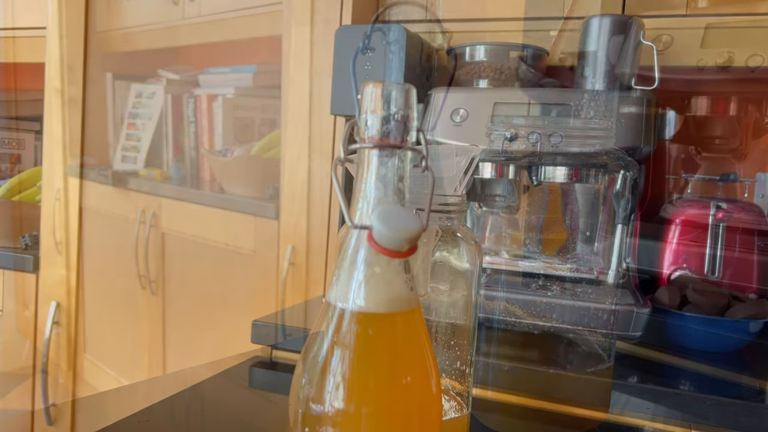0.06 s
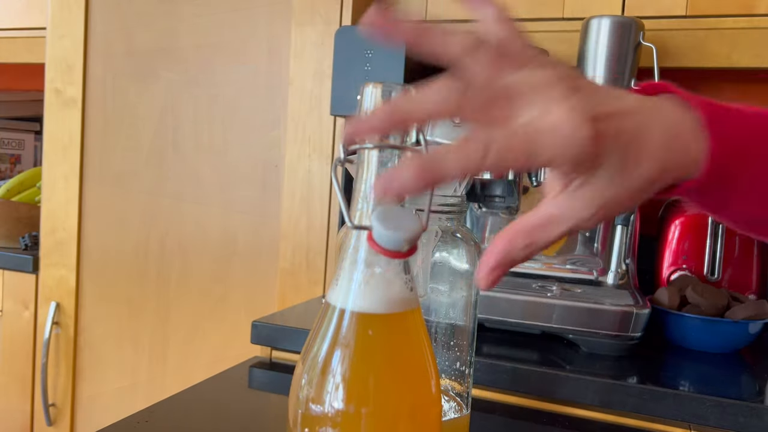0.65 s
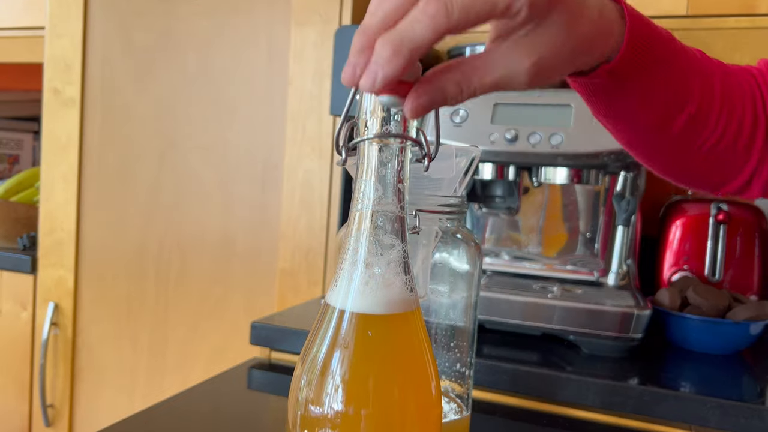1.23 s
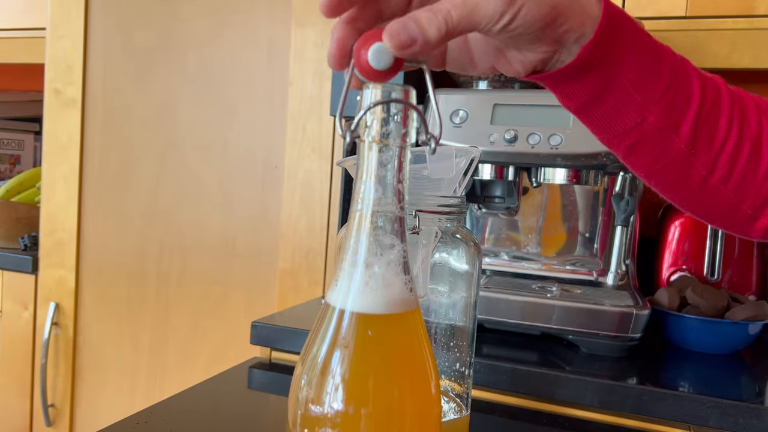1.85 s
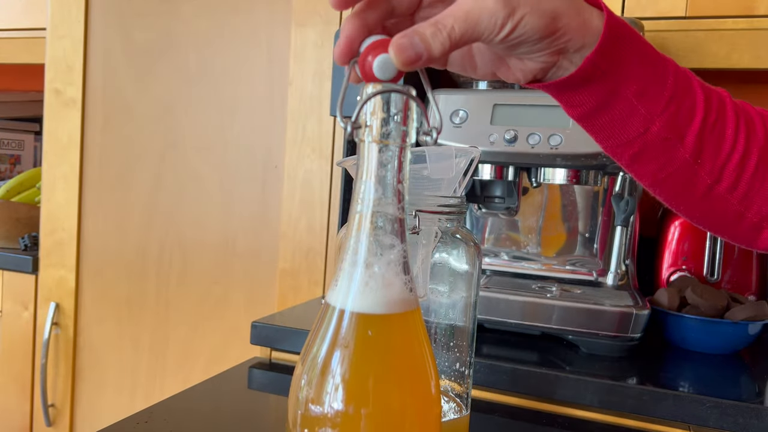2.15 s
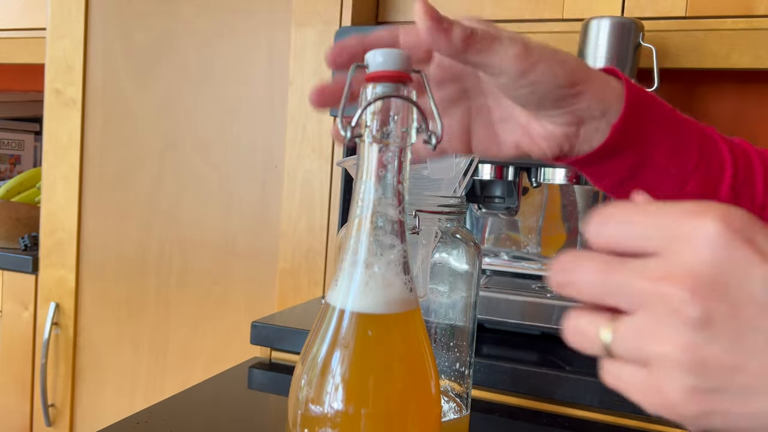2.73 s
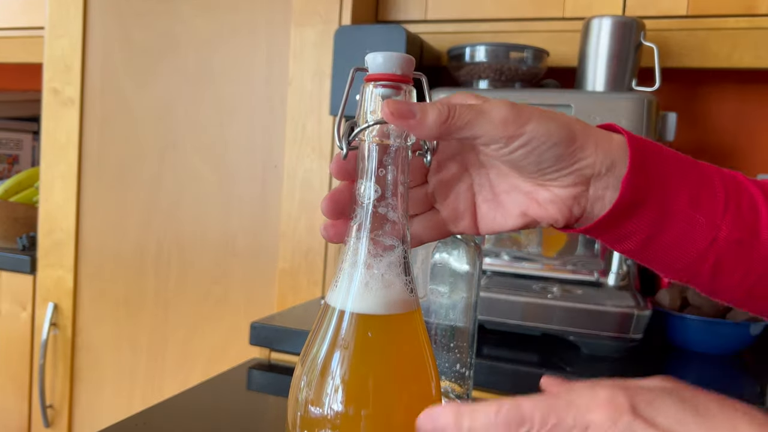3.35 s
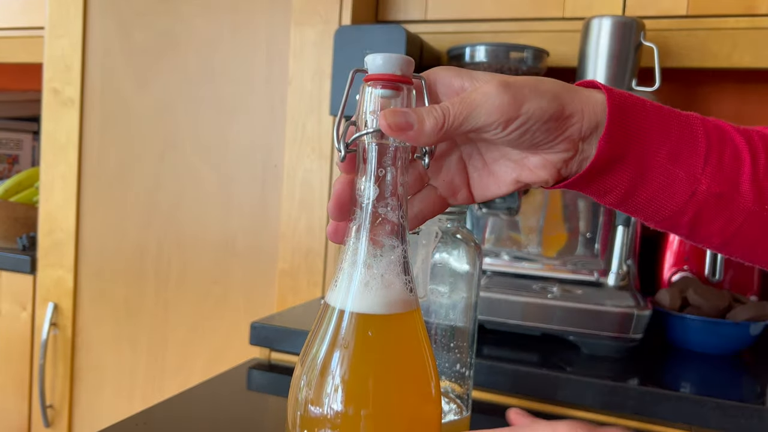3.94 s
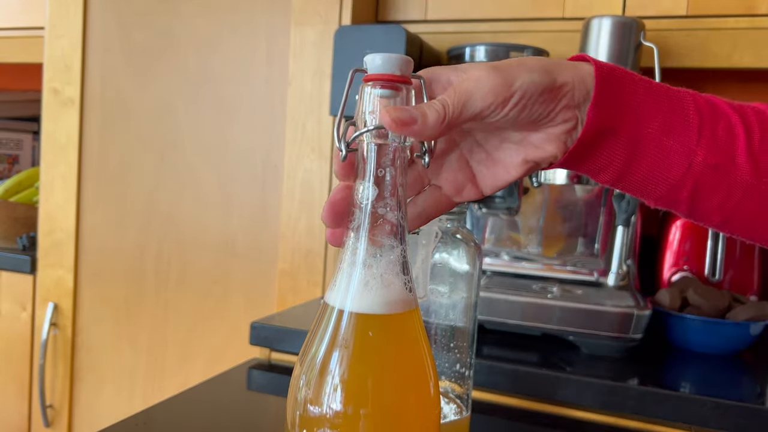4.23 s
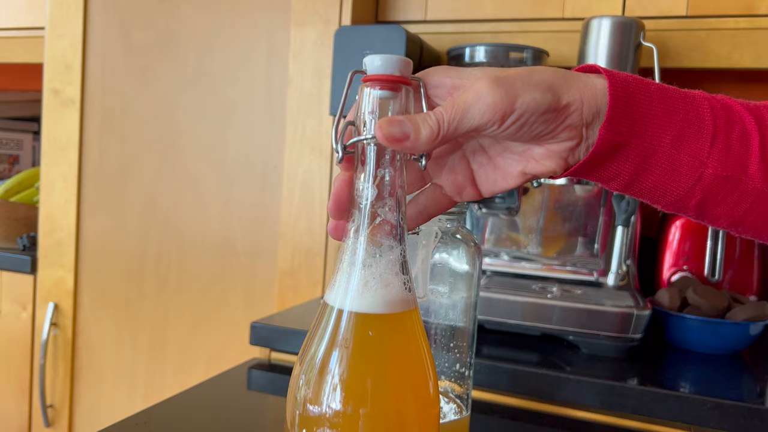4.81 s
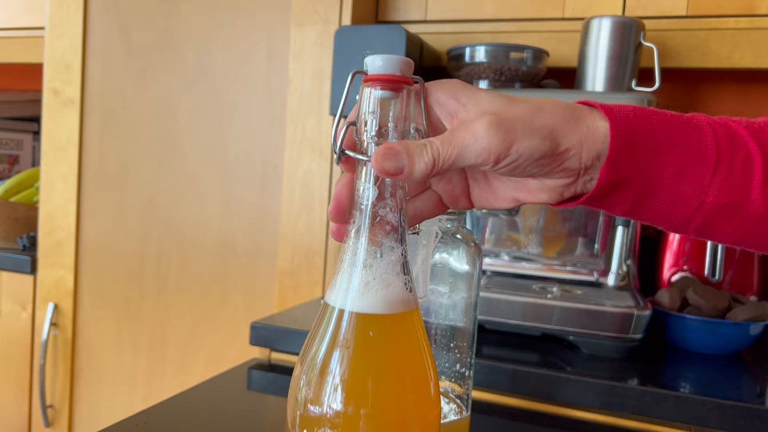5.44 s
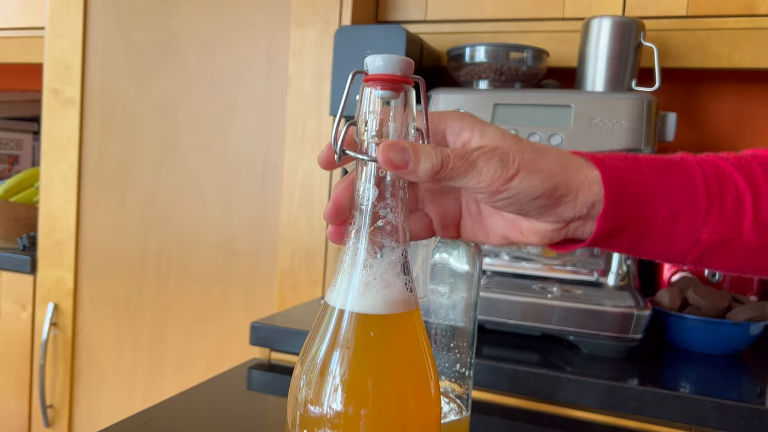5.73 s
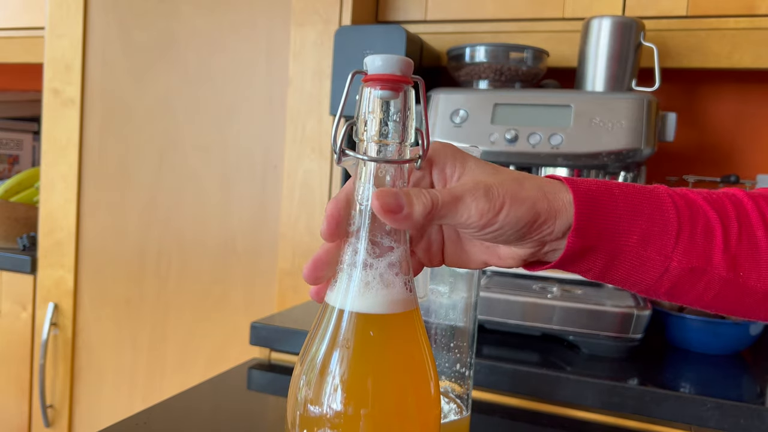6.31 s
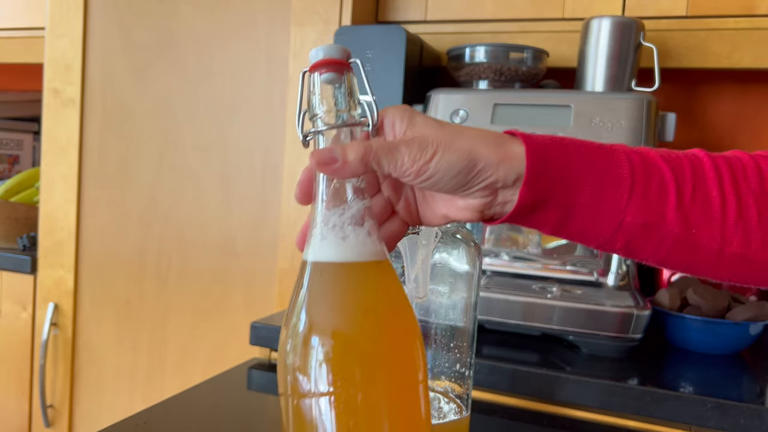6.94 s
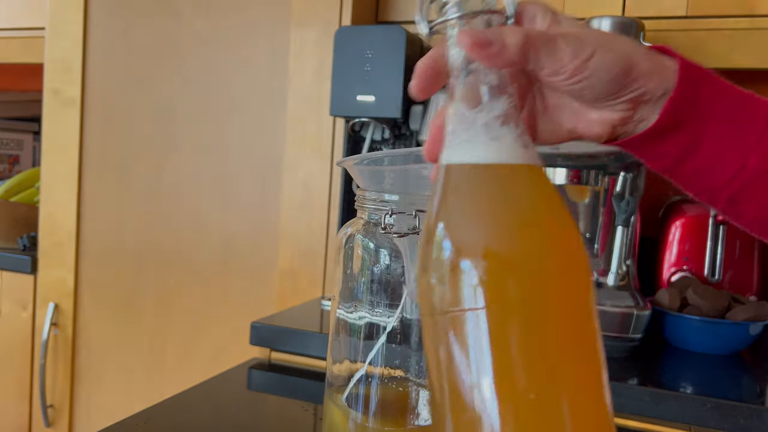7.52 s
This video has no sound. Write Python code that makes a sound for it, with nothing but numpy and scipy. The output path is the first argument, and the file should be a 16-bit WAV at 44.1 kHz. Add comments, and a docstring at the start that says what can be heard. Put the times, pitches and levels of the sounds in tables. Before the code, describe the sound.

A swing-top stopper is closed on a full glass bottle in a quiet kitchen. The loose wire clasp clinks lightly against the neck, with soft finger knocks and a faint sleeve rustle. The stopper scrapes and knocks into the mouth. After a pause, the lever shuts with one loud, sharp snap that briefly rings the glass. A few soft bumps follow. It is heard close, in stereo, slightly to the left.

```python
"""A swing-top stopper is closed on a filled glass bottle. Quiet kitchen, stereo pair close, bottle just left.
Over the room's low rumble the loose wire bail clinks and rings on the neck, fingers and rubber seal bump
the glass, and a sleeve brushes past. At 3.1 s the stopper scrapes and knocks into the mouth.
At 5.4 s the lever cracks over its dead point and slams on the glass, ringing bottle and worktop.
The hand shifts its grip, and at 6.7 s the base judders as the bottle is lifted."""
import sys
import numpy as np
from scipy import signal
from scipy.fft import rfft, irfft, next_fast_len
from scipy.io import wavfile
from scipy.ndimage import uniform_filter1d

SR = 44100
rng = np.random.default_rng(int(sys.argv[2]) if len(sys.argv) > 2 else 0)


def bounce(signal):
    """Save signal as a 16-bit WAV file at the path given by the first command-line argument."""
    frames = np.transpose(np.atleast_2d(signal))
    limited = np.clip(frames, -1, 1)
    pcm = np.round(limited * 32767).astype(np.int16)
    wavfile.write(sys.argv[1], SR, pcm)


N = 333837

# room tone of the kitchen: (frequency [Hz], relative level [dB])
ROOM_TONE_SPECTRUM = [(15, -45.5), (25, -24), (53, -2), (97, -6.5), (157, -6), (185, -12), (427, -26),
                      (659, -30), (1070, -44), (1650, -35), (4140, -49), (7920, -52.5), (10100, -60.5),
                      (13600, -47), (16000, -67.5)]
# wire touching glass or its own hinge: (time [s], strength [dB], hardness [0-1], ping re strength [dB])
CLINKS = [(0.0182, -52, 0.48, -28), (0.065, -54.5, 0.4, -25), (0.755, -55.5, 0.16, -9),
          (0.825, -34.5, 0.58, -13), (0.8458, -41.5, 0.6, -25), (0.8794, -39.5, 0.52, -12),
          (1.1828, -51, 0.61, -25), (1.2094, -40, 0.6, -26), (1.5212, -49.5, 0.24, -17),
          (1.5703, -47.5, 0.38, -26), (1.8455, -48, 0.69, -1), (1.8812, -43, 0.28, -20),
          (2.2462, -51, .55, -21), (2.4555, -44, 0.42, -20), (2.548, -34, 0.51, -11.5),
          (2.5638, -43, 0.5, 4), (3.014, -43.5, 0.6, -12.5), (3.0212, -45.5, 0.43, -20),
          (3.0835, -47.5, 0.3, -8), (3.1016, -33, 0.63, -13), (3.3309, -47, 0.03, -11),
          (5.8485, -51.5, 0.4, -15.5), (5.888, -52, 0.42, -15)]
# parts of a clink: (level re strength at middling hardness [dB], gain from softest to hardest [dB])
CLICK_LAW = (-4, 23.6)  # wire on wire
TICK_LAW = (-9.5, 34)  # sharp tick
CLACK_LAW = (-11, -21.5)  # wire on the neck
BAIL_LAW = (-15, -4)  # low ring of the bail
LEVER_LAW = (-20.5, -14.5)  # ring of the lever
# tone colours of the contacts and of the sleeve: (frequency [Hz], relative level [dB])
CLICK_SPECTRUM = [(800, 1), (2000, -1), (2800, 5), (4200, -3), (5500, 1.5), (6300, -9.5), (7200, 5.5),
                  (9000, 1.5), (11500, -1), (16000, -24)]
CLACK_SPECTRUM = [(150, -2.5), (450, -13), (750, -1.5), (1150, -2.5), (1400, -19.5), (1750, -1.5),
                  (2500, -10), (5000, -59.5), (16000, -40)]
TICK_SPECTRUM = [(2000, -44), (7000, -24.5), (11000, -14), (13000, 15), (15000, 14), (16500, -27)]
CLOTH_SPECTRUM = [(240, -33), (400, -4.5), (460, -6), (504, -2.5), (1180, -9), (2220, -8), (8760, -18.5),
                  (10100, -39), (11400, -14), (16000, -27)]
SCRAPE_CRACK_SPECTRUM = [(150, -26), (700, -8), (1200, -13), (2000, -7), (4000, -6), (6500, -15),
                         (12000, -14), (13200, 0), (15200, 0), (16500, -8)]
CLATTER_SPECTRUM = [(50, -7.5), (110, -13), (190, -3.5), (290, -5.5), (560, 2.5), (800, 1), (1150, 2.5),
                    (1400, -1), (2200, 1.5), (4000, -1), (5600, 1.5), (6400, -7.5), (9000, -6),
                    (12000, -16), (14800, -12), (16500, -24)]
# modes of wire bail, wire lever, worktop and filled bottle: (frequency [Hz], level [dB], t60 [s])
BAIL_MODES = [(1520, -10, .1), (1669, -8, .12), (2611, -5, .2), (2700, -3, .14), (2780, -6, .18),
              (4070, -3, .16), (4230, -4, .1), (4330, -4, .1), (4834, -13, .18), (5362, -11, .14),
              (5443, -7, .15), (5565, 1.5, .16), (7041, -16, .12), (8253, -10, .09), (8700, -12, .12),
              (14560, -10, .08)]
LEVER_MODES = [(1104, -4, .3), (2961, -1, .52), (6850, -17, .25)]
WORKTOP_MODES = [(60.2, -20.5, 0.27), (160.5, -11, .22), (201, 0, 0.031), (246.1, -8, 0.096)]
BOTTLE_MODES = [(345, -14, .04), (495, -11, .035), (565, -5, .065), (633, -2, .055), (773, -14, .06),
                (833, -15, .08), (1075, 1, .025), (1095, -11, .13), (1163, -13, .18), (1195, -13, .1),
                (1626, -22, .08), (1895, -20, .12), (2121, -19, .33), (2186, -20, .12), (3205, -23, .08),
                (4054, -25, .1), (5413, -22, .13)]
# soft blows of stopper and fingers on the bottle: (time [s], strength [dB], pitch [Hz])
KNOCKS = [(0.066, -46.5, 1100), (0.461, -54.5, 650), (0.771, -45, 1080), (0.858, -45.5, 810),
          (0.88, -39, 1470), (0.917, -45, 925), (1.227, -42.5, 693), (1.518, -56, 930), (2.07, -54.5, 1140),
          (2.217, -57.5, 1200), (2.449, -47, 850), (2.474, -48.5, 613), (2.552, -42, 880),
          (3.102, -41.5, 660), (3.178, -39, 654), (3.73, -49.5, 725), (4.391, -49, 750),
          (5.933, -40.5, 790), (6.021, -45, 720), (6.145, -46.5, 591)]
# strokes of sleeve and hand: (start [s], length [s], level [dB])
STROKES = [(0.321, 0.44, -63), (0.719, 0.49, -61.5), (1.297, 0.28, -66.5), (3.953, 0.41, -73),
           (5.91, 0.4, -71)]
# the stopper scrapes in (first two rows), then the lever cracks over: (time [s], level [dB], decay [s])
SCRAPE_AND_CRACKS = [(3.0965, -32, .003), (3.1005, -33, .003), (5.4312, -29, .006), (5.4362, -6, .0005),
                     (5.4372, -18, .003)]
# the lever lands and rebounds: (time [s], blow on the bottle [dB], wire clatter [dB], clatter decay [s])
LEVER_BLOWS = [(5.4442, -28.5, -35.5, 0.0016), (5.4473, -12.5, -22.5, 0.01), (5.4527, -27, -20.5, 0.024)]
# reverberation time of the kitchen: (frequency [Hz], t60 [s])
ROOM_T60 = [(100, 0.2), (300, 0.61), (1000, 0.47), (3000, 0.54), (6000, 0.55), (10000, .4), (15000, 0.87)]
# reverberant tail at the microphones: (frequency [Hz], level re the sound sent into the room [dB])
ROOM_TAIL_LEVEL = [(100, -4.5), (300, -6), (1000, -3.5), (3000, -4), (6000, -9), (15000, -15)]
# likeness of diffuse sound across the pair: (frequency [Hz], correlation [-1 to 1])
MIC_CORRELATION = [(60, 0.96), (150, 0.97), (290, 0.66), (640, -0.18), (1200, -0.0056), (3000, 0.17),
                   (7000, 0.24), (15000, -0.36)]
# shading of the pair: (frequency [Hz], left minus right [dB])
MIC_BALANCE = [(200, .5), (400, 1.5), (700, -2), (1200, -1), (2300, -.5), (4000, 4.5), (5500, 6), (7000, 2),
               (9000, 0), (15000, .5)]


def from_db(db):
    """Decibels to gain."""
    return 10 ** (np.asarray(db) / 20)


def unit_rms(x):
    """Scale to unit power."""
    return x / np.sqrt(np.mean(x ** 2) + 1e-20)


def at_hz(points, hz):
    """Read a table on a log-frequency axis."""
    f, value = np.transpose(points)
    return np.interp(np.log(np.maximum(hz, 1)), np.log(f), value)


def causal_filter(spectrum, size=4096):
    """Minimum-phase impulse response of a spectrum: nothing sounds before the blow."""
    gain = from_db(at_hz(spectrum, np.fft.rfftfreq(size, 1 / SR)))
    cepstrum = irfft(np.log(gain))
    cepstrum[1:size // 2] *= 2
    cepstrum[size // 2 + 1:] = 0
    return irfft(np.exp(rfft(cepstrum)))


def colour(x, spectrum):
    """Give a white signal a spectrum, keeping its power."""
    response = causal_filter(spectrum)
    return signal.oaconvolve(x, response / np.linalg.norm(response))[:N]


def butterworth(x, kind, hz):
    """A gentle filter of the given kind."""
    return signal.sosfilt(signal.butter(2, hz, kind, fs=SR, output="sos"), x)


def stereo_noise(hz, count):
    """Spectra of white noise at the two microphones, alike in the bass and barely related in the treble."""
    mid, side = rfft(rng.standard_normal((2, count)))
    alike = np.clip(at_hz(MIC_CORRELATION, hz), -1, 1)
    return np.sqrt((1 + alike) / 2) * mid + np.sqrt((1 - alike) / 2) * side * [[1], [-1]]


def diffuse(spectrum):
    """Steady coloured noise reaching the pair from all round; rms 1."""
    count = next_fast_len(N, True)
    hz = np.fft.rfftfreq(count, 1 / SR)
    shaped = stereo_noise(hz, count) * from_db(at_hz(spectrum, hz))
    return unit_rms(irfft(shaped, count)[:, :N])


def room_tone(level_db=-57.5):
    """The kitchen's low, steady rumble."""
    return from_db(level_db) * diffuse(ROOM_TONE_SPECTRUM)


def chatter(times, levels_db, decay_s, size=4096):
    """Each contact is a spray of tiny impacts that dies within milliseconds."""
    out = np.zeros(N + size)
    for when, db, decay in zip(times, levels_db, np.broadcast_to(decay_s, len(times))):
        envelope = np.exp(-np.arange(size) / (SR * decay))
        spray = rng.standard_normal(size) * envelope
        at = round(when * SR)
        out[at:at + size] += from_db(db) * spray * np.linalg.norm(envelope) / np.linalg.norm(spray)
    return out[:N]


def strike(modes, times, levels_db, spread_db, detune=0.0, size=30000):
    """Every blow rings all modes; where it lands sets their strengths, and the grip shifts their pitch."""
    hz, db, t60 = np.transpose(modes)
    t, out = np.arange(size) / SR, np.zeros(N + size)
    fade = from_db(-60 * t / t60[:, None])
    polarity = (-1) ** np.arange(len(modes))
    scatter = rng.standard_normal((len(times), 2, len(modes)))
    for when, level, (place, grip) in zip(times, levels_db, scatter):
        strength = from_db(level + db + spread_db * place) * polarity
        phase = 2 * np.pi * np.outer(hz * (1 + detune * grip), t)
        at = round(when * SR)
        out[at:at + size] += strength @ (fade * np.sin(phase))
    return out[:N]


def wire_clinks(ping_above_hz=5000):
    """The loose wires tick on the neck and ring on: a hard touch is bright, a soft one clacks."""
    times, strength, hardness, ping = np.transpose(CLINKS)
    click_db, tick_db, clack_db, bail_db, lever_db = [
        strength + db + swing_db * (hardness - 0.5)
        for db, swing_db in (CLICK_LAW, TICK_LAW, CLACK_LAW, BAIL_LAW, LEVER_LAW)]
    contact = colour(chatter(times, click_db, decay_s=0.0051), CLICK_SPECTRUM)
    contact += colour(chatter(times, clack_db, decay_s=0.0064), CLACK_SPECTRUM)
    ticks = colour(chatter(times, tick_db, decay_s=0.0045), TICK_SPECTRUM)
    # every touch stirs the bail's low modes; one near the hinge sets the high ones pinging
    is_low = np.array(BAIL_MODES)[:, 0] < ping_above_hz
    drive_db = np.where(is_low, bail_db[:, None], (strength + ping)[:, None])
    ring = strike(BAIL_MODES, times, drive_db, spread_db=1.0, detune=0.0028)
    ring += strike(LEVER_MODES, times, lever_db, spread_db=1.5, detune=0.0015)
    return contact, ticks, ring


def soft_knocks(touch_db=-10, hollow_db=-6, decay_s=0.012, thud_pivot_hz=748, thud_db_per_octave=-9):
    """Rubber seal and fingers bump the bottle; the grip damps it to a short knock, pitched by the spot."""
    times, strength, pitch = np.transpose(KNOCKS)
    touch = colour(chatter(times, strength + touch_db, decay_s), CLACK_SPECTRUM)
    knocks = butterworth(touch, "low", hz=3200)
    for when, db, hz in zip(times, strength, pitch):
        bump = chatter([when], [db + hollow_db], decay_s)
        hollow = signal.lfilter(*signal.iirpeak(hz, Q=7, fs=SR), bump + 1e-18)
        knocks += hollow * np.linalg.norm(bump) / np.linalg.norm(hollow)  # keeps the bump's energy
    # the lower the contact's pitch, the harder it thuds through the worktop
    thud_db = strength + 1.5 + thud_db_per_octave * np.log2(pitch / thud_pivot_hz)
    thuds = strike(WORKTOP_MODES, times, thud_db, spread_db=2.0, detune=0.06)
    return butterworth(knocks, "low", hz=1490) + thuds


def sleeve(grain_db=1.5, rise_share=0.31):
    """Cloth and skin slide with a fine, uneven grain; each stroke swells and fades."""
    t = np.arange(N) / SR
    swell = sum(from_db(db) * np.interp((t - start) / length, [0, rise_share, 1], [0, 1, 0])
                for start, length, db in STROKES)
    grain = unit_rms(uniform_filter1d(rng.standard_normal(N), size=250))
    return uniform_filter1d(swell, size=2000) * from_db(grain_db * grain) * diffuse(CLOTH_SPECTRUM)


def scrape_and_cracks():
    """A short bright scrape as the stopper slides in; bright cracks as the lever passes its dead point."""
    times, levels_db, decay_s = np.transpose(SCRAPE_AND_CRACKS)
    return colour(chatter(times, levels_db, decay_s), SCRAPE_CRACK_SPECTRUM)


def lever_slam(thud_db=-6, wire_db=-27):
    """The lever hits the glass and rebounds: bottle and worktop ring, the taut wire rings and clatters."""
    times, blow_db, clatter_db, decay_s = np.transpose(LEVER_BLOWS)
    glass = strike(BOTTLE_MODES, times, blow_db, spread_db=3.0)
    thud = strike(WORKTOP_MODES, times, blow_db + thud_db, spread_db=2.5)
    wire = strike(BAIL_MODES, times, clatter_db + wire_db, spread_db=0.5, detune=0.019)
    clatter = colour(chatter(times, clatter_db, decay_s), CLATTER_SPECTRUM)
    return glass + thud + wire + clatter


def bottle_lift(at_s=6.738, width_s=0.012, pitch_hz=275, level_db=-51):
    """The base judders briefly on the worktop as it leaves it."""
    t = np.arange(N) / SR - at_s
    return from_db(level_db) * np.exp(-(t / width_s) ** 2) * np.sin(2 * np.pi * pitch_hz * t)


def direct_path(x, lag_samples=3):
    """Direct sound reaches the left microphone just before the right."""
    return np.array([x, np.roll(x, lag_samples)])


def kitchen_reverb(x, early_db=-5, early_s=0.031, gap_s=0.0035, build_s=0.012):
    """Quick reflections from worktop and cupboards, then a tail with its own decay in each band."""
    t, hz = np.arange(SR) / SR, np.fft.rfftfreq(SR, 1 / SR)
    noise, response = stereo_noise(hz, SR), 0
    since = np.maximum(t - gap_s, 0)
    early = from_db(early_db) * unit_rms(np.exp(-since / early_s) * (since > 0))
    edges_hz = np.geomspace(60, 18000, 13)
    for low, high in zip(edges_hz, edges_hz[1:]):
        centre = np.sqrt(low * high)
        tail = from_db(-60 * t / at_hz(ROOM_T60, centre)) * (1 - np.exp(-since / build_s))
        envelope = np.hypot(from_db(at_hz(ROOM_TAIL_LEVEL, centre)) * unit_rms(tail), early)
        band = irfft(noise * ((hz >= low) & (hz < high)), SR)
        response += band * envelope / np.sqrt(SR)
    return signal.oaconvolve(x[None], response, axes=1)[:, :N]


def mic_shading(pair):
    """The two microphones are shaded differently from band to band."""
    shades = [causal_filter([(hz, side * db / 2) for hz, db in MIC_BALANCE]) for side in (1, -1)]
    return np.array([signal.oaconvolve(x, shade)[:N] for x, shade in zip(pair, shades)])


def scene(ring_room_db=-5, tick_room_db=-6, scrape_crack_room_db=-5):
    """The bottle stands on the worktop, close to the pair and slightly left, with the kitchen around it."""
    contact, ticks, ring = wire_clinks()
    scrape_cracks = scrape_and_cracks()
    slam = lever_slam()
    blows = contact + soft_knocks() + slam + bottle_lift()
    # sharp ticks beam at the microphones and stir the room less; ring, scrape and cracks are drier too
    into_room = blows + from_db(tick_room_db) * ticks
    into_room += from_db(ring_room_db) * ring + from_db(scrape_crack_room_db) * scrape_cracks
    bottle = direct_path(blows + ring + ticks + scrape_cracks) + kitchen_reverb(into_room)
    return mic_shading(bottle) + sleeve() + room_tone()


def record(dry, bass_cut_hz=30, dip_hz=(9550, 10550), top_cut_hz=16300):
    """The microphones lose the deepest bass and have a narrow dip in the treble; the top is cut steeply."""
    x = butterworth(dry, "high", bass_cut_hz)
    x = butterworth(x, "stop", dip_hz)
    return signal.sosfilt(signal.ellip(10, 0.2, 80, top_cut_hz, fs=SR, output="sos"), x)


dry = scene()
out = record(dry)
bounce(out)
```